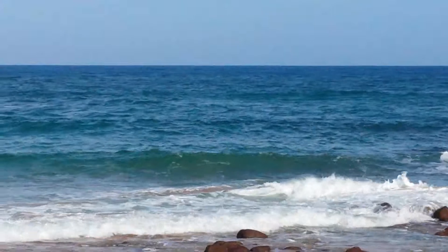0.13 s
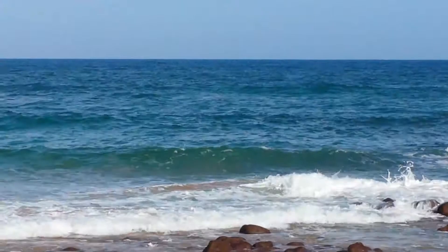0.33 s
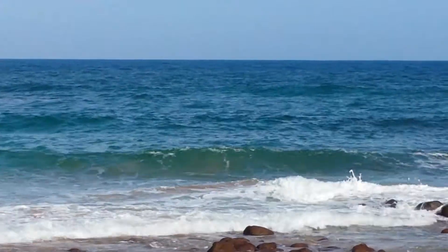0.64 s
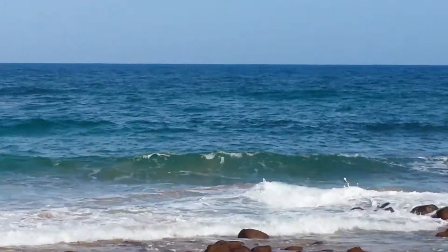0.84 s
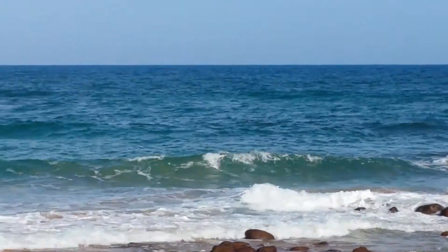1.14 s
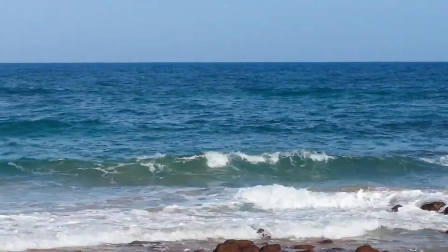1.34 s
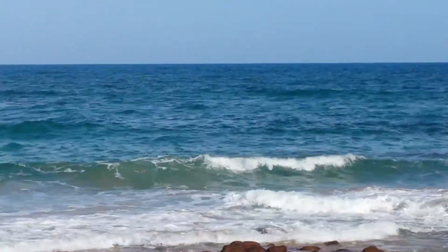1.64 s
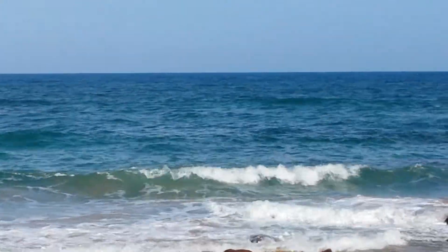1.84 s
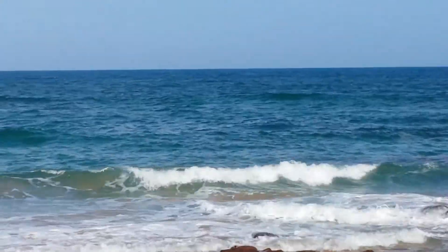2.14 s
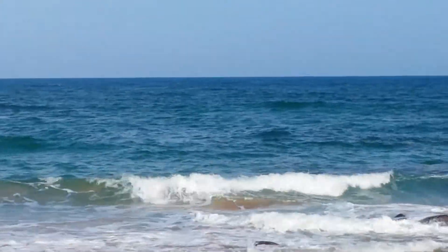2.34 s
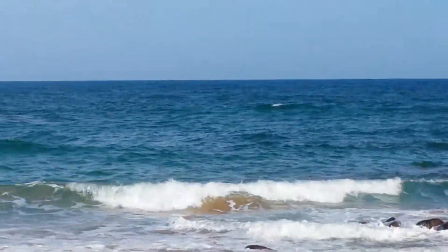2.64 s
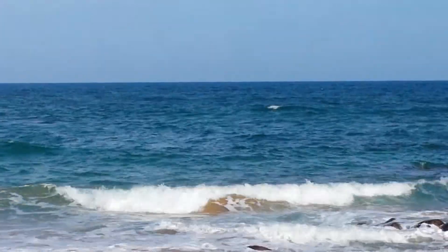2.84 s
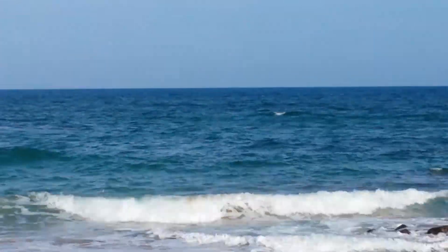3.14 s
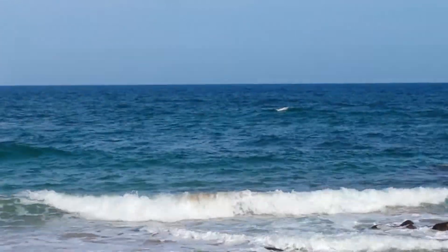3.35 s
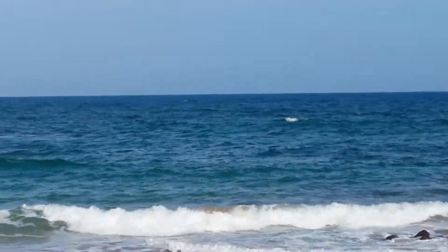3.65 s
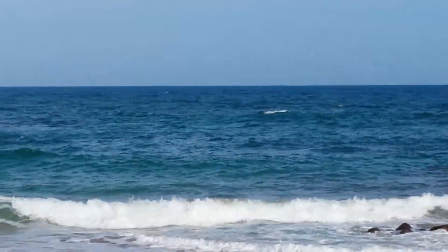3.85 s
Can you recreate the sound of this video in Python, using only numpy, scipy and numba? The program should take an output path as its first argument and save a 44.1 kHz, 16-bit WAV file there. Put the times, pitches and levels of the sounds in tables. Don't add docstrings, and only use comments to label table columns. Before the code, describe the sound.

Ocean surf on a rocky shore, heard in stereo from a handheld phone. Silence until about 0.4 s, then a quick fade into a dense, steady roar. Low backwash rumbles close by, easing slightly later. Spray hiss builds from 0.9 s, bursting near 2.2 s; a farther wave swells and crashes loudest around 3.4 s. Fine foam fizzes throughout, with brief soft wind thumps on either side, clearest near 0.7 and 1.8 s.

```python
import sys
import numpy as np
from scipy import signal
from scipy.fft import rfft, irfft
from scipy.io import wavfile
from scipy.ndimage import uniform_filter1d, map_coordinates
from numba import njit

SR = 44100
rng = np.random.default_rng(int(sys.argv[2]) if len(sys.argv) > 2 else 0)


def level_to_linear(level):
    exponent = np.asarray(level, float) / 20
    return 10 ** exponent


def digitize_waveform(pressure):
    field = np.atleast_2d(pressure).T
    bounded = np.clip(field, -1, 1)
    quanta = np.round(bounded * 32767).astype(np.int16)
    wavfile.write(sys.argv[1], SR, quanta)


N = 176400
HZ = np.fft.rfftfreq(N, 1 / SR)

# (time [s], level [dB])
BACKWASH_LEVELS = [
    (.4, -25),
    (1.0, -25.5),
    (1.5, -25.5),
    (1.9, -25.5),
    (2.2, -26),
    (2.6, -25.5),
    (2.9, -27),
    (3.2, -26),
    (3.5, -26),
    (4.0, -27.5),
]
# (time [s], level [dB])
BREAKER_LEVELS = [
    (.4, -38),
    (1.0, -35),
    (1.6, -33.5),
    (2.2, -31),
    (2.8, -29.5),
    (3.4, -26.5),
    (4.0, -27),
]
# (time [s], level [dB])
SPRAY_LEVELS = [
    (.4, -41),
    (.9, -33),
    (1.4, -30.5),
    (1.8, -30.5),
    (2.15, -27),
    (2.5, -29),
    (3.0, -28),
    (3.3, -29),
    (4.0, -28),
]
# (frequency [Hz], level [dB per Hz])
BACKWASH_TONE = [(25, -28), (60, -5.5), (120, 3.5), (240, -3), (430, -1), (1000, -5.5), (3500, -13.5),
                 (15000, -14.5)]
BREAKER_COLOUR = [(300, -32), (800, -7), (1400, -1.5), (2200, 1.8), (2800, -5.5), (3300, -9), (8000, -20.5),
                  (15000, -4)]
SPRAY_COLOUR = [(1000, -7), (3000, -10), (4300, -5), (5200, -0.3), (7500, -4), (9000, -1), (10000, -2.5),
                (15000, -5)]
# (time [s], level [dB], port [0 left, 1 right])
WIND_PUFFS = [
    (.6, -35, 1),
    (.73, -26, 1),
    (1.0, -32, 1),
    (1.6, -33, 0),
    (1.79, -25.5, 0),
    (2.38, -31, 1),
    (3.36, -30, 0),
    (3.7, -36, 0),
    (3.92, -35, 1),
]

# (frequency [Hz], gain [dB])
LEFT_BODY = [(200, 2.2), (450, 5.5), (700, 1), (1200, 7), (1700, 5), (2100, 4.5), (2800, 1.5), (3500, 0)]
RIGHT_BODY = [(200, 0), (420, 1), (600, -3), (900, 3.5), (1150, -3.5), (1600, 2), (2100, -7), (2500, -0.5)]
# (frequency [Hz], gain [dB])
LEFT_TREBLE = [(3500, 0.1), (4300, 1.5), (5100, 5.5), (5800, 6), (6500, 0.5), (7200, -6.5), (8800, -9),
               (9500, -15)]
RIGHT_TREBLE = [(2500, 2.86), (3200, 2.5), (4000, 4.8), (5500, 4.3), (7300, 10.5), (8500, 5.6),
                (10000, 1.8), (14000, 0.12)]
# (frequency [Hz], share [0-1])
COMMON_SHARE = [(50, .75), (200, .985), (470, .98), (700, .62), (880, .78), (1080, .6), (1300, .78),
                (1750, .4)]
# (frequency [Hz], factor on the common share [1])
COMMON_SHARE_TREBLE = [(2400, 1.), (2900, .3), (3700, 1.2), (4400, .3), (5300, 1.), (6200, .3), (8000, .2)]
# (frequency [Hz], phase [rad])
LEFT_TRAIL_LOW = [(40, 0), (300, .36), (500, .6), (650, 1.4), (900, .85), (1080, 1.2), (1400, 3.),
                  (1850, 3.)]
LEFT_TRAIL_HIGH = [(1850, 0), (2200, 2.7), (2600, 3.6), (3500, 4.3), (4000, 6.4), (5000, 8.4), (5500, 10.7),
                   (6000, 12.4)]

SWELL_DB, PATCH_DB, FLICKER_DB = 0.38, 0.72, 0.37
BUBBLES_PER_S, BUBBLE_DB, BUBBLE_SPREAD_DB = 1500, -41, 3.5
BUBBLE_LOW_HZ, BUBBLE_OCTAVES, BUBBLE_CYCLES = 355.4, 4.5, 8.3
WIND_DB, WIND_HZ, GUST_DB = -48.5, 68, 5
PUFF_S, PUFF_HZ = 0.016, 109
LEFT_EDGE_HZ, LEFT_FALL_DB_OCT = 9500, 200
TOP_HZ = 14540
START_S, FADE_S, FADE_BEND = .4235, .1, .78


def water(tone, levels):
    noise = irfft(rfft(rng.standard_normal((3, N))) * level_to_linear(curve(tone, HZ)), N)
    times, db = np.array(levels).T
    roar = level(churn(noise)) * level_to_linear(np.interp(np.arange(N) / SR, times, db))
    return at_ports(roar[0], roar[1:])


def churn(x):
    f, t, z = signal.stft(x, SR, nperseg=512)
    frames_per_s = SR / 256
    band_hz = 60 * 2 ** (np.arange(25) / 3)
    patches = uniform_filter1d(walk(5.4, (25, len(t)), frames_per_s), size=5, axis=0)
    db = SWELL_DB * walk(3, len(t), frames_per_s) + PATCH_DB * patches / patches.std()
    db = db + FLICKER_DB * walk(20, patches.shape, frames_per_s)
    row = np.interp(np.log(np.maximum(f, 1)), np.log(band_hz), np.arange(25))
    db = map_coordinates(db, np.meshgrid(row, np.arange(len(t)), indexing="ij"), order=1)
    return signal.istft(z * level_to_linear(db), SR, nperseg=512)[1][..., :N]


def foam():
    rows = []
    for _ in range(3):
        when, pitch, rarity = rng.random((int(BUBBLES_PER_S * N / SR), 3)).T
        start = (when * N).astype(np.int64)
        size = level_to_linear(-BUBBLE_SPREAD_DB * np.log(1 - .98 * rarity))
        hz = np.minimum(BUBBLE_LOW_HZ * 2 ** (BUBBLE_OCTAVES * pitch), SR / 4)
        rows.append(level(ring(np.zeros(N), start, hz, BUBBLE_CYCLES, size, 0.15)))
    return level_to_linear(BUBBLE_DB) * at_ports(rows[0], np.array(rows[1:]))


@njit
def ring(out, at, hz, cycles, size, glide):
    for k in range(len(at)):
        n = cycles * SR / hz[k]
        phase = 0.
        for i in range(min(int(4 * n), len(out) - at[k])):
            phase += 2 * np.pi * hz[k] * (1 + glide * i / n) / SR
            out[at[k] + i] += size[k] * np.exp(-1.5 * i / n) * np.sin(phase)
    return out


def wind():
    t = np.arange(N) / SR
    puffs = np.zeros((2, N))
    for s, db, port in WIND_PUFFS:
        puffs[int(round(port))] += level_to_linear(db) * np.exp(-((t - s) / PUFF_S) ** 2)
    gusts = level_to_linear(WIND_DB + GUST_DB * walk(2.4, (2, N), SR))
    return gusts * swirl(WIND_HZ) + puffs * swirl(PUFF_HZ)


def swirl(hz):
    ratio = HZ / hz
    shape = ratio ** 2 / (1 + ratio ** 3.64)
    return level(irfft(rfft(rng.standard_normal((2, N))) * shape, N))


def at_ports(common, own):
    share = np.clip(curve(COMMON_SHARE, HZ) * curve(COMMON_SHARE_TREBLE, HZ), 0, 1)
    trail = curve(LEFT_TRAIL_LOW, HZ) + curve(LEFT_TRAIL_HIGH, HZ)
    late = np.array([np.exp(-1j * trail), np.ones(len(HZ))])
    shared = np.sqrt(share) * late * rfft(common)
    alone = np.sqrt(1 - share) * rfft(own)
    return irfft(shared + alone, N)


def walk(rate, shape, per_s):
    k = max(int(per_s / rate), 1)
    w = uniform_filter1d(rng.standard_normal(shape), k, axis=-1)
    w = uniform_filter1d(w, k, axis=-1)
    w = w - uniform_filter1d(w, 4 * k, axis=-1)
    return w / w.std()


def curve(table, x):
    table = np.array(table, float)
    return np.interp(np.log(np.maximum(x, 1)), np.log(table[:, 0]), table[:, 1])


def level(x):
    return x / np.sqrt(np.mean(x ** 2))


def scene():
    backwash = water(BACKWASH_TONE, BACKWASH_LEVELS)
    breaker = water(BREAKER_COLOUR, BREAKER_LEVELS)
    spray = water(SPRAY_COLOUR, SPRAY_LEVELS)
    return backwash + breaker + spray + foam() + wind()


def roll_off(x):
    return signal.sosfilt(signal.butter(12, 14540, fs=SR, output="sos"), x)


def record(dry):
    left_fall = np.clip(LEFT_FALL_DB_OCT * np.log2(np.maximum(HZ, 1) / LEFT_EDGE_HZ), 0, 60)
    left = level_to_linear(curve(LEFT_BODY, HZ) + curve(LEFT_TREBLE, HZ) - left_fall)
    right = level_to_linear(curve(RIGHT_BODY, HZ) + curve(RIGHT_TREBLE, HZ))
    fade = np.clip((np.arange(N) / SR - START_S) / FADE_S, 0, 1) ** FADE_BEND
    heard = irfft(rfft(dry) * np.array([left, right]) * (HZ < TOP_HZ), N) * fade
    return roll_off(heard)


dry = scene()
out = record(dry)
digitize_waveform(out)
```